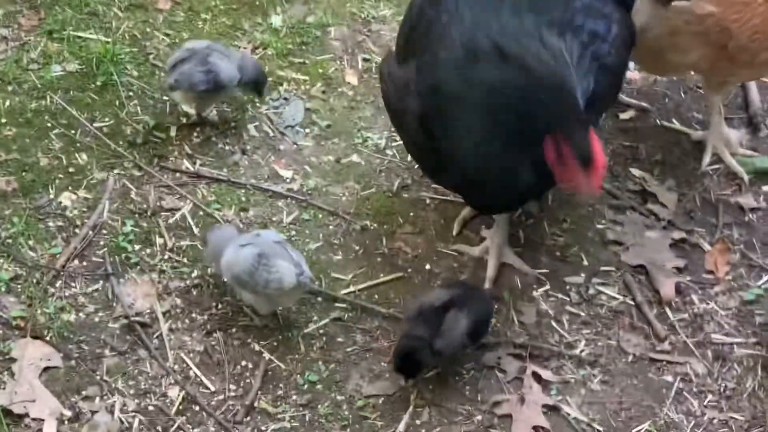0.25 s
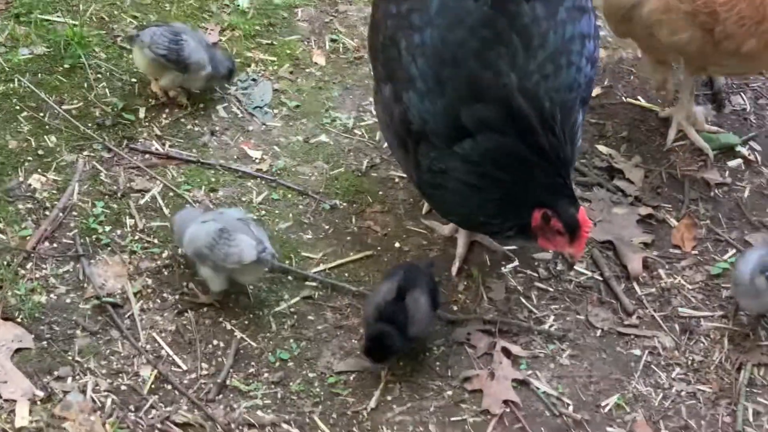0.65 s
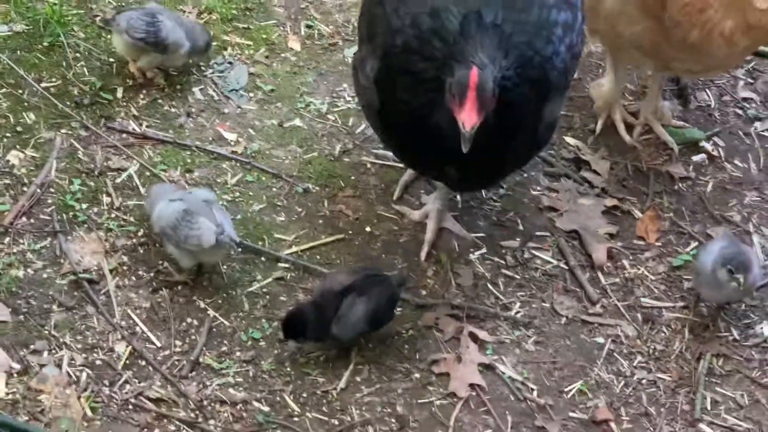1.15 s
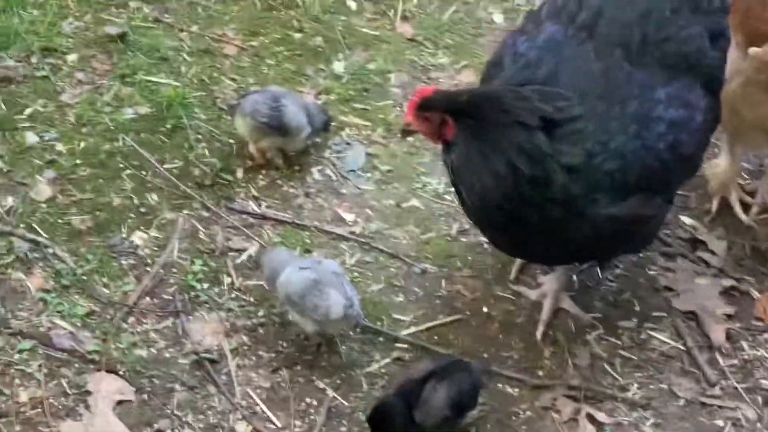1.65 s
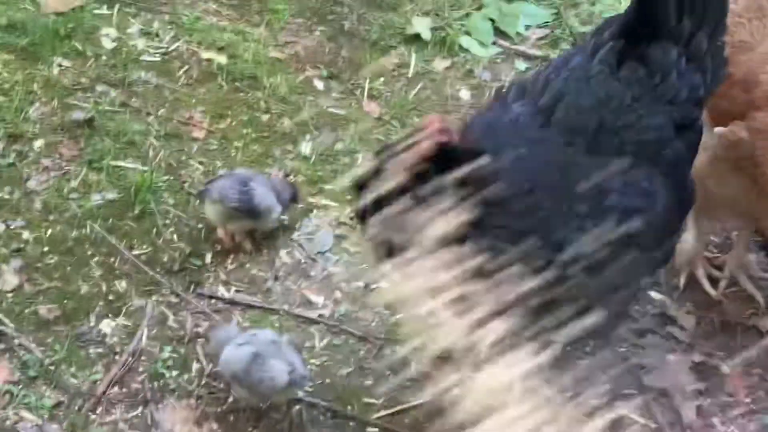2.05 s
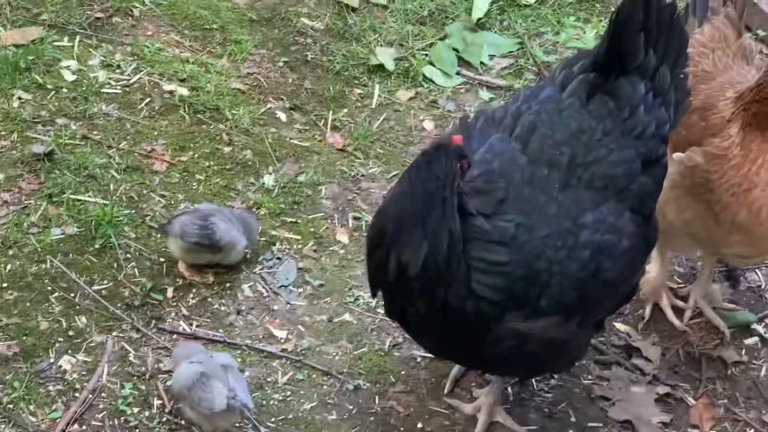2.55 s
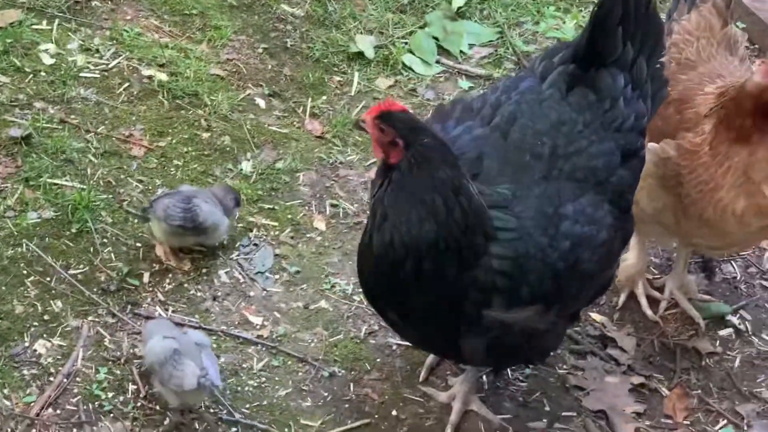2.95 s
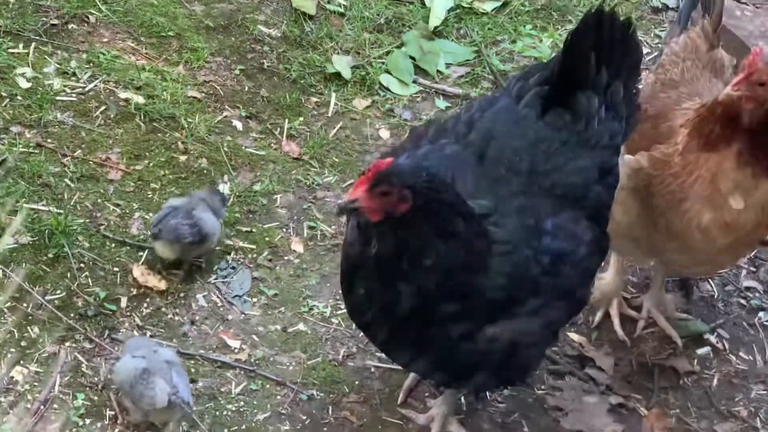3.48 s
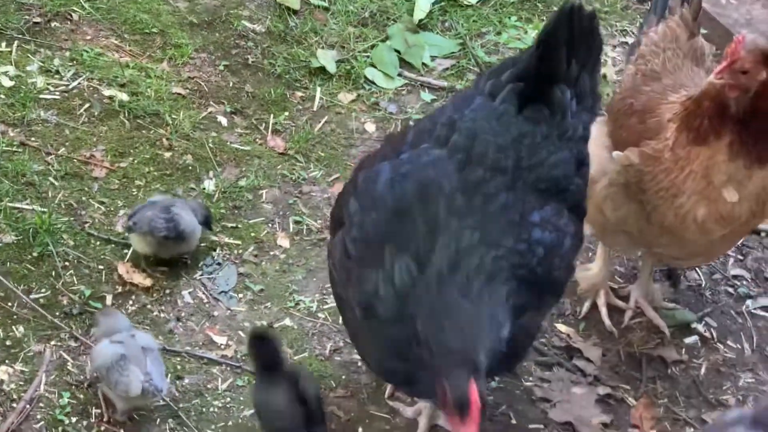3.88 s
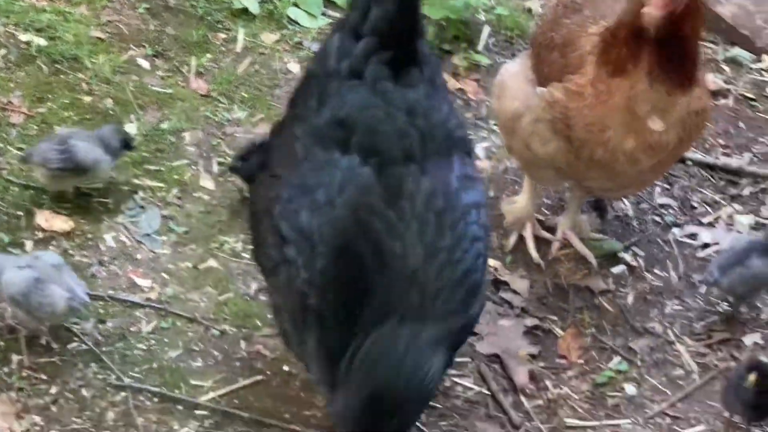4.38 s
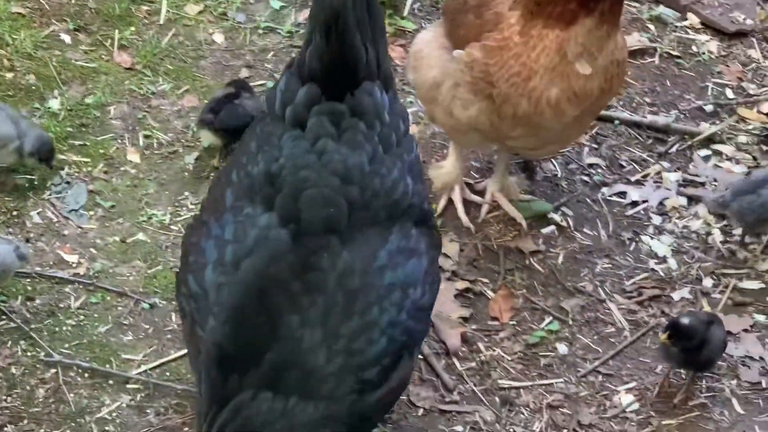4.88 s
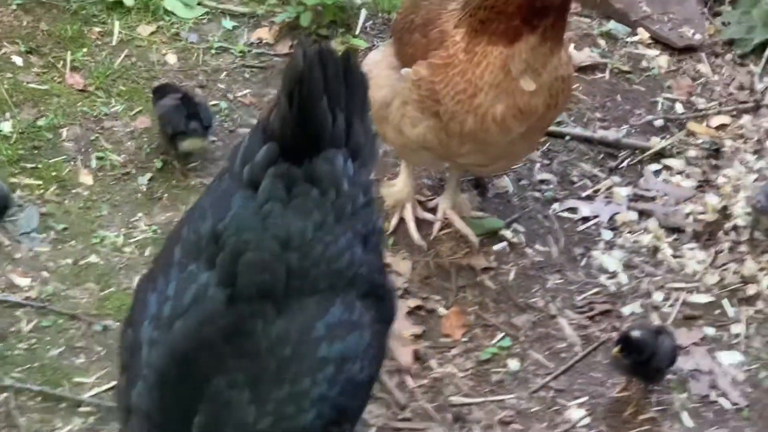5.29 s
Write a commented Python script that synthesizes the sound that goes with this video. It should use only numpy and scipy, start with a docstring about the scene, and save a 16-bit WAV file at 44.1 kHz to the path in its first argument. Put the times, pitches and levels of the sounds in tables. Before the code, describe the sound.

Over a faint outdoor rumble, throaty hens mutter brief clucks and chicks whistle thin, short peeps. After a small thump, an arm swishes softly and grain hits dry litter in a bright patter, then loose grains tick and a second handful falls. Nasal jay cries return from the trees, clearer near the end, with clucks, peeps and light pecks. The handheld microphone is close and dry.

```python
"""Hens cluck softly over a low outdoor rumble; chicks peep close by and a jay cries from the trees.
Later a hand swings out twice and scatters feed, which patters and bounces on dry leaves and soil.
Hens are pulses ringing a throat, chicks are sliding whistles, and the jay is a stack of partials
that turns hoarse. Feed is many tiny impacts; swishes and rumble are shaped noise.
The two-port microphone cuts the lowest bass and has two notches in its treble."""
import sys
import numpy as np
from scipy import signal
from scipy.fft import rfft, irfft, next_fast_len
from scipy.io import wavfile
from scipy.ndimage import map_coordinates

SR = 44100
rng = np.random.default_rng(int(sys.argv[2]) if len(sys.argv) > 2 else 0)


def log_audio(samples):
    """Write samples as a 16-bit WAV file to the path given in sys.argv[1]."""
    # one column per channel
    frames = np.atleast_2d(samples).T
    # limit to full scale, then quantise
    limited = np.clip(frames, -1, 1)
    pcm = np.round(limited * 32767).astype(np.int16)
    wavfile.write(sys.argv[1], SR, pcm)


N = 243873  # samples in the scene

# Cluck syllables. Each row: start in seconds, length in seconds, pitch in Hz halfway through its rise,
# level in dB, depth from 0 (bright and throaty) to 1 (deep and chesty).
CLUCK_SYLLABLES = [ (.001, 0.0086, 256, -35.5, 0.12), (.029, .009, 244, -53, 0.53),
                   (0.395, 0.015, 229, -44.5, .2), (.42, 0.015, 286.4, -42, .1),
                   (0.437, 0.023, 306.3, -39, 0.88), (.48, 0.0078, 320.4, -38, 0.89),
                   (0.912, 0.016, 225, -51.5, 0.39), (0.938, 0.013, 271.3, -43.5, 0.18),
                   (1.215, 0.0073, 252, -62, 0.74), (1.252, 0.01, 258, -58, .65),
                   (1.265, 0.012, 251, -41, 0.64), (1.301, 0.02, 312.6, -41, 0.55),
                   (1.327, .0082, 288, -41.5, 0.24), (2.335, 0.012, 286, -47.5, 0.074),
                   (2.826, 0.02, 236.4, -44.5, 0.37), (2.873, 0.01, 259, -48, 0.42),
                   (2.889, 0.0041, 349, -38.5, 0.12), (2.946, .019, 260, -50.5, 0.42),
                   (2.974, 0.0094, 279, -45.5, .05), (3.688, 0.0054, 277, -49, 0.46),
                   (3.737, 0.022, 291, -38, 0.52), (3.769, 0.03, 315.5, -42.5, 0.63),
                   (4.096, 0.031, 311.2, -41, 0.93), (4.143, .013, 295, -44, 0.91),
                   (4.163, 0.011, 313, -39.5, 1), (4.391, 0.0082, 200, -54.5, .3),
                   (4.413, 0.011, 272.4, -44.5, 0.33), (4.661, 0.007, 284, -51, 0.79),
                   (4.709, 0.033, 323.4, -37, 0.76), (5.237, 0.036, 276.3, -54.5, 0.85),
                   (5.285, 0.012, 240, -49, 0.82), (5.298, 0.01, 339, -37.5, 0.93)]
# Falling peeps. Each row: start in seconds, length in seconds, top pitch in Hz,
# bend (over 1 lingers before it slides), level in dB before a shared lift, side from -1 right to 1 left.
FALLING_PEEPS = [ (.081, 0.025, 3020, 1.6, -71, 0), (.253, 0.057, 3410, 2.24, -50.5, -0.32),
                 (.406, 0.075, 3440, 2.04, -50.5, -.35), (.79, 0.059, 3527, 1.34, -49, -.08),
                 (.933, 0.056, 3480, 2.5, -50, 0), (.991, 0.02, 3230, 1.5, -61, 0),
                 (1.095, 0.031, 3370, 1.1, -57.5, -.16), (1.512, 0.049, 3430, 1.2, -62, -0.35),
                 (1.844, 0.034, 2950, 1.2, -66.5, 0), (1.952, .021, 2950, 1.6, -67.5, 0),
                 (2.034, 0.0304, 2840, 2.2, -75.5, 0), (2.17, 0.018, 2790, 1.4, -68.5, .3),
                 (2.726, .041, 3170, 0.92, -60, -.2), (3.105, 0.042, 3100, 1.4, -67, 0),
                 (3.63, 0.038, 3130, 1.2, -72, 0), (3.823, 0.048, 3380, 1, -46.5, .39),
                 (3.955, 0.044, 3390, .95, -47.5, 0.39), (4.666, 0.04, 3260, .9, -57.5, 0),
                 (4.781, 0.065, 3250, 1, -56, 0.34), (4.897, .046, 3436, 1.1, -54, 0),
                 (5.255, 0.027, 3570, .95, -54.5, -0.18), (5.361, 0.055, 3290, 1.05, -66, -.25),
                 (5.479, .057, 3340, 0.86, -65.5, -0.29)]
# Rising chirps. Each row: as for the peeps, but the pitch in Hz is the one it starts from.
RISING_CHIRPS = [(.254, .03, 2290, 2.3, -62.5, 0.2), (1.236, .03, 2330, 1.5, -60, .1),
                 (1.264, .048, 2766, 0.63, -58.5, .45), (1.371, .035, 2464, 3.1, -55.5, 0.19),
                 (1.388, .028, 2640, 1, -60.5, 0.31)]
# Jay cries. Each row: start in seconds, pitch in Hz before it bends, level in dB,
# echo in dB against the cry, extra hoarseness in dB.
JAY_CRIES = [(0, 597, -72.5, 0, 7.5), (.382, 597.6, -60.5, -2, 9), (2.901, 553, -78, 3.5, 8.5),
             (3.999, 624.3, -51.5, -4.5, 7), (4.419, 632.7, -51.5, -1.5, 1), (5.02, 620, -53, 0.5, 2)]
# The jay's partials. Each row: multiple of the pitch, level in dB before it flutters.
JAY_PARTIALS = [(2, -25), (3, -11), (4, -0.5), (5, -8.5), (6, -29.5)]
# Handfuls landing. Each row: time in seconds, then the levels in dB of ticking on leaves and
# pattering on soil, before the boost at impact and the fading.
HANDFULS = [(2.323, -37.5, -53), (3.711, -36, -52)]
# Loose grains in the hand and under the beaks. Each row: start in seconds, length in seconds
# before the fade, level in dB of the ticking on leaves.
GRAIN_RATTLES = [(0, .33, -75.5), (1.72, .24, -75), (2.272, 0.061, -62), (3.228, 0.12, -54.5),
                 (3.445, 0.24, -61), (3.683, 0.032, -47.5), (4.792, 0.25, -74.5)]
# Swishes of the arm and scuffs. Each row: time of the peak in seconds, width in seconds (each side,
# to 1/e), level in dB, added brightness in dB per octave.
ARM_SWISHES = [(1.055, 0.016, -69.5, 4), (1.819, 0.083, -63, 1.5), (3.192, 0.092, -61, 1),
               (4.342, 0.029, -58, 13.5)]
# Single grains and pecks. Each row: start in seconds, level in dB at the start, knock in dB against
# the snap, added brightness in dB per octave, left minus right in dB.
GRAIN_TICKS = [(1.043, -41.5, -16, 2, -2), (1.8464, -41.5, -20, 9, 1), (2.18, -57.5, -35, 11, -2),
               (2.2486, -51.5, -40, 6, 6), (2.2642, -38.5, -34, 0.5, -1), (2.4863, -25.5, -32, 2.5, -4),
               (2.5298, -30.5, -39, 1, 4), (2.596, -40, -17, 1, -5), (3.1882, -40, -24.5, 1.5, -7),
               (3.247, -32, -40, 6, -1), (3.2856, -31.5, -32, 4, 0.5), (3.3333, -29, -43, 0.5, -1.5),
               (3.3876, -30, -50, -3, 4), (3.457, -26.5, -23.5, 1.5, -3.5), (3.4903, -29.5, -12.5, 3, 0.5),
               (3.5115, -30, -22, -1, -1), (3.571, -38.5, -46, -0.5, -4.5), (3.6086, -39, -41, 6.5, 2),
               (3.919, -21.5, -37, -4.5, 0.5), (4.6587, -46, -29, 20.5, 0.5), (4.805, -42, -41, 11, -0.5),
               (4.854, -47.5, -33, 4.5, -5.5), (4.8976, -42, -18, 9, -3), (4.9524, -41, -43, 7, 1),
               (5.004, -52.5, -22, 8, -4), (5.2616, -43, -27, 20, -1)]
# Spectra of grains on leaves, grains on soil, sliding cloth and outdoor air.
# Each row: frequency in Hz, relative level in dB per Hz.
LEAF_SPECTRUM = [(1500, -62.5), (3500, -16), (5200, -16.5), (8000, -8), (10000, -8.5), (14500, -13.5),
                 (16000, -27.5)]
SOIL_SPECTRUM = [(100, -16.5), (250, -8), (900, -8), (1500, -0.5), (3000, 2), (4800, 2.5), (6500, 0),
                 (10000, -44.5)]
SLEEVE_SPECTRUM = [(600, -11.5), (1800, -1.5), (3000, 2), (5000, -8.5), (6800, -0.5), (9000, -10),
                   (15000, -30)]
AIR_SPECTRUM = [(25, -8), (60, 7), (100, -5), (160, -19.5), (300, -29.5), (800, -36), (2400, -39.5),
                (4000, -49), (9000, -46.5), (14500, -48.5), (15600, -58.5)]
# How alike the outdoor air is at both ports. Each row: frequency in Hz, likeness from 0 to 1.
AIR_LIKENESS = [(60, 0.96), (130, 0.91), (300, 0.28), (700, 0.1), (3000, 0.028)]
# Left-right balance of the hens. Each row: frequency in Hz, left minus right in dB.
HEN_LEFT_RIGHT = [(150, 1), (300, -4), (600, 3.5), (850, -0.5), (1600, 13)]
# Left-right timing of the hens. Each row: frequency in Hz, radians by which left leads.
HEN_LEFT_LEAD = [(100, 0.79), (300, .35), (550, 0.96), (800, -.1), (1100, 0.23), (2000, -2.4)]
# Echoes of the yard and the trees. Each row: frequency in Hz, seconds to fade by 60 dB.
YARD_FADE = [(200, 0.2), (1000, 0.21), (8000, 0.035)]
TREES_FADE = [(500, 0.94), (2500, 0.4), (6000, 0.65)]
# Microphone notches. Each row: centre in Hz, half width in Hz, gain at the centre in dB.
MIC_NOTCHES = [(7134, 870, -8.5), (11584, 670, -15)]
# Level of the rumble before it surges. Each row: time in seconds, level in dB.
RUMBLE_LEVEL = [(0, -63), (.6, -61), (1.35, -61.5), (2.1, -68.5), (3.1, -68.5), (3.8, -63), (5.53, -68)]

PORT_DELAY_S = 0.00027  # between the ports, for a sound from the side
TOP_HZ = 16000  # nothing is heard above this
LITTER_SIDE, LITTER_SPREAD = 0.46, 0.36  # where the grains fall, -1 right to 1 left

CLUCK_RISE_HZ_PER_S = 2200  # pitch climbs through every syllable
THROAT_HZ, THROAT_SINK_HZ = 742, 235  # throat resonance, and how far it sinks in the deepest clucks
CHEST_DB, CHEST_GROWTH_DB = -16.5, 23  # chest resonance in the brightest clucks, and what depth adds

PEEP_FALL = -0.18  # pitch change as a share of the top pitch
CHIRP_RISE = 0.15  # pitch change as a share of the start pitch

CRY_ATTACK_S, CRY_HOLD_S, CRY_RELEASE_S = 0.028, 0.1, 0.043
CRY_SCOOP, CRY_SCOOP_S = 0.171, 0.01141  # the cry starts this share flat and scoops up
CRY_DROP, CRY_DROP_AT_S, CRY_DROP_S = 0.125, 0.1, 0.013  # then steps down: share, when, how gradually
CRY_NOISE_DB, CRY_BREAKUP_DB_PER_S = -27, 130.5  # hoarseness at the start, and how fast it grows

RATTLE_ATTACK_S, RATTLE_FADE_DB_PER_S = 0.016, 190

# the first landing is louder than the bouncing after it: how long that lasts (to 1/e), boosts in dB
IMPACT_S, LEAF_IMPACT_DB, SOIL_IMPACT_DB = 0.081, 7, 13.5
# the shower rises, the grains keep bouncing, then the last come to rest
SHOWER_RISE_S, SHOWER_S, SHOWER_END_S = 0.014, 0.36, 0.186
LEAF_SETTLE_DB_PER_S, SOIL_SETTLE_DB_PER_S = 78, 60.5


def amp(db):
    """Turn decibels into gain."""
    return 10 ** (np.asarray(db) / 20)


def unit(x):
    """Scale a sound to rms 1."""
    return x / np.sqrt(np.mean(x ** 2) + 1e-20)


def along(points, hz):
    """Read values between (Hz, value) points on a log frequency axis."""
    f, v = np.transpose(points)
    return np.interp(np.log(hz + 1), np.log(f + 1), v)


def filtered(x, response):
    """Multiply each frequency of x by a complex response."""
    n = x.shape[-1]
    padded = next_fast_len(n + 8192)
    hz = np.fft.rfftfreq(padded, 1 / SR)
    return irfft(rfft(x, padded) * response(hz), padded)[..., :n]


def coloured(x, spectrum):
    """Shape x by the given spectrum, at rms 1."""
    return unit(filtered(x, lambda f: amp(along(spectrum, f))))


def tilted(spectrum, tilt_db):
    """Make a spectrum brighter by tilt_db per octave."""
    return [(hz, db + tilt_db * np.log2(hz / 1000)) for hz, db in spectrum]


def resonance(f, hz, width):
    """Response of a hollow that rings at hz, with gain 1 there."""
    return 1j * f * width / (hz * hz - f * f + 1j * f * width)


def wobble(n, count):
    """Draw a smooth random curve of n samples through count knots."""
    return map_coordinates(rng.standard_normal(count), [np.linspace(0, count - 1, n)])


def envelope(t, attack, hold, release):
    """Make a gain that rises from t = 0, holds and falls back to silence."""
    return np.clip(np.minimum(t / attack, 1 - (t - attack - hold) / release), 0, 1)


def placed(x, side):
    """A sound from one side reaches the nearer port first."""
    ports = np.array([[1], [-1]])
    return filtered(x, lambda f: np.exp(1j * np.pi * f * side * PORT_DELAY_S * ports))


def add(track, s, x):
    """Mix x into the track at time s."""
    part = track[:, max(0, round(s * SR)):][:, :x.shape[-1]]
    part += x[..., :part.shape[1]]


def echo(x, decay, seconds):
    """Give x a fresh stereo tail of noise; each frequency dies at its own speed."""
    hz, t, z = signal.stft(rng.standard_normal((2, int(seconds * SR))), SR, nperseg=256)
    fade = amp(-60 * t / along(decay, hz)[:, None])
    tail = signal.istft(z * fade, SR, nperseg=256)[1]
    return signal.fftconvolve(x[None], tail / np.linalg.norm(tail[0]), axes=1)


def grains(rate, spread_db, spectrum, crackle_s=0.002, crackle_db=1, count=5):
    """Tiny impacts of uneven size (rate per second) on several patches of ground, at rms 1."""
    out, noise = np.zeros((2, N)), rng.standard_normal(N)
    for side in LITTER_SIDE + LITTER_SPREAD * np.linspace(-1, 1, count):
        when, luck, sign = rng.random((int(rate * N / SR / count), 3)).T
        # most grains are small, a few much bigger
        size = amp(spread_db * np.minimum(-np.log(1 - luck), 4)) * np.sign(sign - 0.5)
        hits = np.bincount((when * N).astype(int), size, N)
        # every impact leaves a short crackle in the litter
        energy = signal.lfilter([1], [1, -np.exp(-1 / (crackle_s * SR))], hits ** 2)
        crackle = np.sqrt(energy) * np.roll(noise, rng.integers(N))
        patch = unit(hits) + amp(crackle_db) * unit(crackle)
        lead = round(side * PORT_DELAY_S * SR / 2)
        out[0] += np.roll(patch, -lead)
        out[1] += np.roll(patch, lead)
    return coloured(out, spectrum)


def outdoors(air_db=-73, surge_db=2):
    """Far rumble that surges, most alike at both ports in the bass, under a thin even hiss."""
    turn = lambda f: np.arccos(np.clip(along(AIR_LIKENESS, f), -1, 1)) / 2
    split = lambda f: amp(along(AIR_SPECTRUM, f)) * [np.cos(turn(f)), np.sin(turn(f))]
    mid, side = filtered(rng.standard_normal((2, N)), split)
    pair = np.array([mid + side, mid - side])
    low = filtered(pair, lambda f: 1 / (1 + (f / 170) ** 4))
    rumble_db = np.interp(np.arange(N) / SR, *np.transpose(RUMBLE_LEVEL))
    surge = wobble(N, count=60)
    return amp(rumble_db + surge_db * surge) * unit(low) + amp(air_db) * unit(pair - low)


def jay(rough=0.011, flutter_db=2.5, rasp_hz=2550, rasp_width=1200):
    """A nasal, arching cry turns hoarse and lingers among the trees; each partial flutters on its own."""
    out = np.zeros((2, N))
    t = np.arange(SR // 4) / SR
    scoop = CRY_SCOOP * np.exp(-t / CRY_SCOOP_S)
    drop = CRY_DROP / (1 + np.exp((CRY_DROP_AT_S - t) / CRY_DROP_S))
    arch = 1 - scoop - drop
    swell = envelope(t, CRY_ATTACK_S, CRY_HOLD_S, CRY_RELEASE_S)
    throat = lambda f: resonance(f, rasp_hz, rasp_width) ** 2 / (1 + (f / 3400) ** 20)
    for s, pitch_hz, db, echo_db, hoarse_db in JAY_CRIES:
        hoarse = amp(hoarse_db + CRY_NOISE_DB + CRY_BREAKUP_DB_PER_S * t)
        # the pitch shakes more as the voice turns hoarse
        shake = 1 + rough * (1 + 2 * hoarse) * wobble(len(t), count=68)
        phase = 2 * np.pi * np.cumsum(pitch_hz * arch * shake) / SR
        tone = np.zeros(len(t))
        for multiple, partial_db in JAY_PARTIALS:
            flutter = flutter_db * wobble(len(t), count=24)
            tone += amp(partial_db + flutter) * np.sin(round(multiple) * phase)
        rasp = unit(filtered(rng.standard_normal(len(t)), throat))
        cry = (unit(tone) + hoarse * rasp) / np.hypot(1, hoarse) * swell * amp(db)
        add(out, s, placed(cry, side=0.041) * amp([[1], [-1]]))
        add(out, s + 0.018, amp(echo_db) * echo(cry, TREES_FADE, seconds=0.7))
    return out


def rattles(soil_db=-8):
    """Short spells of loose grains ticking against each other and the ground."""
    t = np.arange(N) / SR
    loose = grains(rate=400, spread_db=2.5, spectrum=LEAF_SPECTRUM)
    loose += amp(soil_db) * grains(rate=260, spread_db=0.5, spectrum=SOIL_SPECTRUM)
    gain = np.zeros(N)
    for s, length, db in GRAIN_RATTLES:
        fade_db = RATTLE_FADE_DB_PER_S * np.maximum(t - s - length, 0)
        gain += np.clip((t - s) / RATTLE_ATTACK_S, 0, 1) * amp(db - fade_db)
    return loose * gain


def syllable(length, start_hz, end_hz, throat_hz, chest_db, jitter=0.056, rasp=0.12,
             throat_width=390, chest_width=200, beak_db=-20, hiss_db=-43, bite=0.3, burst=0.93):
    """A handful of uneven pulses rings the hen's chest, throat and beak."""
    t = np.arange(SR // 12) / SR
    pulses = np.zeros(len(t))
    period = 1 / np.linspace(start_hz, end_hz, max(2, round(length * (start_hz + end_hz) / 2)))
    chance = rng.standard_normal((16, 2))[:len(period)]
    times = np.cumsum(period * (1 + jitter * chance[:, 0]))
    # the syllable bursts open and fades more slowly
    progress = (np.arange(len(period)) + 1) / (len(period) + 1)
    swell = np.sin(np.pi * progress ** burst)
    pulses[np.round((times - times[0]) * SR).astype(int)] = swell * amp(0.59 * chance[:, 1])
    # a little breath noise, strongest halfway
    pulses += rasp / 2 * rng.standard_normal(len(t)) * np.exp(-(2 * t / length - 1) ** 2)
    soft = signal.sosfilt(signal.butter(8, 1030, fs=SR, output="sos"), pulses)
    throat = lambda f: resonance(f, throat_hz, throat_width) ** 2
    chest = lambda f: amp(chest_db) * resonance(f, 244.4, chest_width) ** 2
    voice = filtered(soft, lambda f: throat(f) - chest(f))
    # chesty syllables are pushed harder, so their pulses are sharper too
    beak = lambda f: amp(beak_db) * resonance(f, 1530, 350) ** 2
    hiss = lambda f: amp(hiss_db) * resonance(f, 3900, 1900) ** 2
    voice += amp(bite * chest_db) * filtered(pulses, lambda f: beak(f) + hiss(f))
    return voice / np.sqrt(np.sum(voice ** 2) / (length * SR))


def hens(yard_db=-19, sway=0.33):
    """Clucks of one to five syllables, echoed faintly by the yard; depth lowers throat and adds chest."""
    out = np.zeros((2, N))
    for s, length, hz, db, depth in CLUCK_SYLLABLES:
        rise = CLUCK_RISE_HZ_PER_S * length
        throat_hz = THROAT_HZ - THROAT_SINK_HZ * depth ** 3
        chest_db = CHEST_DB + CHEST_GROWTH_DB * depth
        voice = amp(db) * syllable(length, hz - rise / 2, hz + rise / 2, throat_hz, chest_db)
        add(out, s, placed(voice, sway * (2 * rng.random() - 1)))
        add(out, s + 0.00414, amp(yard_db) * echo(voice, YARD_FADE, seconds=0.3))
    ports = np.array([[0.5], [-0.5]])  # half the left-right difference goes to each port
    balance = lambda f: amp(along(HEN_LEFT_RIGHT, f) * ports)
    lead = lambda f: np.exp(1j * along(HEN_LEFT_LEAD, f) * ports)
    return filtered(out, lambda f: balance(f) * lead(f))


def chicks(waver=0.013, overtone_db=-42, fuzz_db=-20, yard_db=-18):
    """An almost pure whistle starts fuzzy and slides along an arc: peeps down, chirps up."""
    out = np.zeros((2, N))
    for calls, slide in (FALLING_PEEPS, PEEP_FALL), (RISING_CHIRPS, CHIRP_RISE):
        for s, length, start_hz, bend, db, side in calls:
            u = np.linspace(0, 1, int(length * SR))  # progress through the call
            tremble = wobble(len(u), count=12)
            hz = start_hz * (1 + slide * u ** bend)
            phase = 2 * np.pi * np.cumsum(hz * (1 + waver * tremble)) / SR
            fuzz = 1 + amp(fuzz_db) * 2 * (1 - u) * wobble(len(u), count=50)
            # all calls are lifted by 1 dB and tremble slightly in level
            swell = np.abs(np.sin(np.pi * u ** 1.1)) ** 1.12 * amp(db + 1.0 + 0.26 * tremble)
            whistle = np.sin(phase) + amp(overtone_db) * np.sin(2 * phase)
            call = swell * fuzz * whistle
            add(out, s, placed(call, side))
            add(out, s + 0.013, amp(yard_db) * echo(call, YARD_FADE, seconds=0.15))
    return out


def swishes():
    """Soft sliding noise as the arm swings or a foot scuffs."""
    t = np.arange(N) / SR
    out = np.zeros((2, N))
    for s, width, db, tilt_db in ARM_SWISHES:
        slide = coloured(rng.standard_normal((2, N)), tilted(SLEEVE_SPECTRUM, tilt_db))
        out += amp(db) * np.exp(-((t - s) / width) ** 2) * slide
    return out


def ticks(snap_t60=0.0043, knock_t60=0.032, yard_db=-20):
    """Single grains and beaks strike leaf and soil: a dry snap over a small knock."""
    out = np.zeros((2, N))
    t = np.arange(SR // 30) / SR
    for s, db, knock_db, tilt_db, pan_db in GRAIN_TICKS:
        leaf = coloured(rng.standard_normal(len(t)), tilted(LEAF_SPECTRUM, tilt_db))
        soil = coloured(rng.standard_normal(len(t)), SOIL_SPECTRUM)
        snap = amp(-60 * t / snap_t60) * leaf
        knock = amp(knock_db - 60 * t / knock_t60) * soil
        tick = amp(db) * (snap + knock)
        side = LITTER_SIDE + LITTER_SPREAD * (2 * rng.random() - 1)
        # a little silence in front leaves room for the earlier port
        direct = placed(np.pad(tick, (32, 0)), side)
        add(out, s, direct * amp([[pan_db / 2], [-pan_db / 2]]))
        add(out, s, amp(yard_db) * echo(tick, YARD_FADE, seconds=0.15))
    return out


def thump(s=1.044, db=-39, start_hz=165, end_hz=62, swell=0.014, sink=0.018):
    """A dull bump on the ground swells briefly while its pitch sinks."""
    out = np.zeros((2, N))
    t = np.arange(SR // 4) / SR
    hz = end_hz + (start_hz - end_hz) * np.exp(-t / sink)
    push = t / swell * np.exp((1 - (t / swell) ** 2) / 2)
    add(out, s, -amp(db) * push * np.sin(2 * np.pi * np.cumsum(hz) / SR))
    return out


def feed(bounce_db=-6, bounce_decay_db_per_s=52):
    """A handful lands all at once, then the grains bounce and settle."""
    leaf = grains(rate=1200, spread_db=4.5, spectrum=LEAF_SPECTRUM)
    soil = grains(rate=700, spread_db=1.0, spectrum=SOIL_SPECTRUM)
    bounces = grains(rate=250, spread_db=6.5, spectrum=LEAF_SPECTRUM)
    out = np.zeros((2, N))
    t = np.arange(SR) / SR
    age = np.maximum(t - SHOWER_RISE_S, 0)
    impact = np.exp(-age / IMPACT_S)
    swell = envelope(t, SHOWER_RISE_S, SHOWER_S, SHOWER_END_S) ** 2
    leaf_change_db = LEAF_IMPACT_DB * impact - LEAF_SETTLE_DB_PER_S * age
    soil_change_db = SOIL_IMPACT_DB * impact - SOIL_SETTLE_DB_PER_S * age
    for s, leaf_db, soil_db in HANDFULS:
        part = np.arange(SR) + round((s - SHOWER_RISE_S) * SR)
        shower = amp(leaf_db + leaf_change_db) * leaf[:, part]
        shower += amp(soil_db + soil_change_db) * soil[:, part]
        # single bounces die away more slowly than the shower, so its tail turns grainy
        strays = amp(leaf_db + bounce_db - bounce_decay_db_per_s * age) * bounces[:, part]
        out[:, part] += swell * (shower + strays)
    return out


def scene():
    """Add up all the sounds of the yard."""
    background = outdoors()
    birds = jay() + hens() + chicks()
    feeding = rattles() + swishes() + ticks() + thump() + feed()
    return background + birds + feeding


def record(dry, low_cut_hz=36):
    """The microphone's low cut and treble notches, then the band limit."""
    notch_db = lambda f: sum(db * np.exp(-np.abs((f - hz) / width) ** 4) for hz, width, db in MIC_NOTCHES)
    low_cut = lambda f: 1 - 1 / (1 + (f / low_cut_hz) ** 4)
    return filtered(dry, lambda f: low_cut(f) * amp(notch_db(f)) * (f < TOP_HZ))


dry = scene()
out = record(dry)
log_audio(out)
```